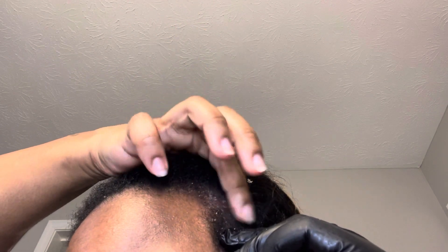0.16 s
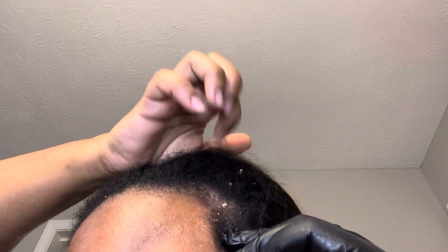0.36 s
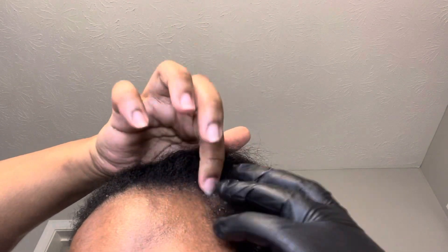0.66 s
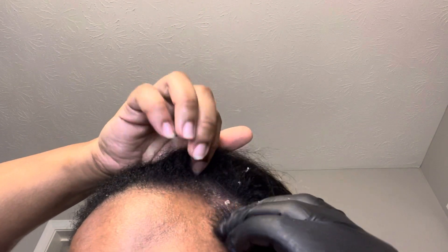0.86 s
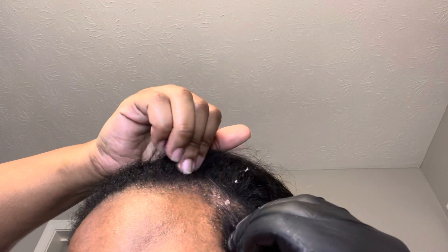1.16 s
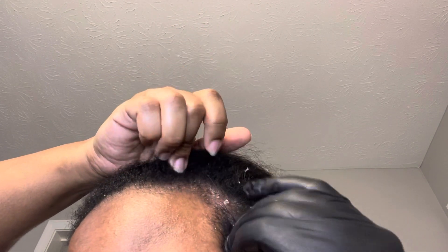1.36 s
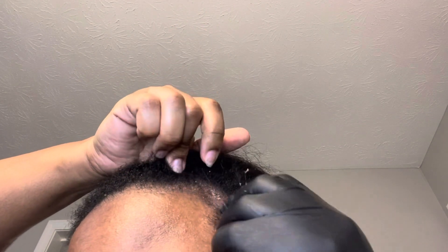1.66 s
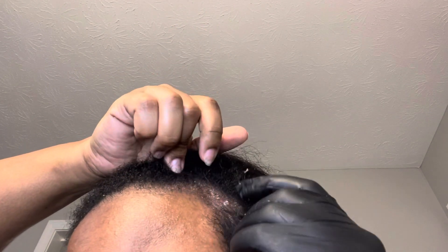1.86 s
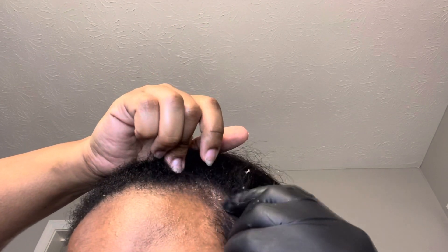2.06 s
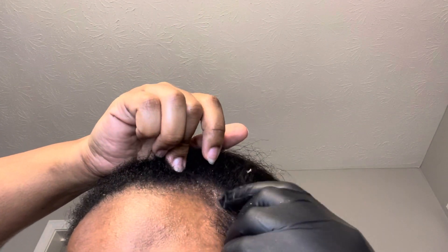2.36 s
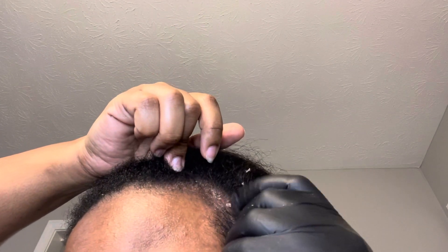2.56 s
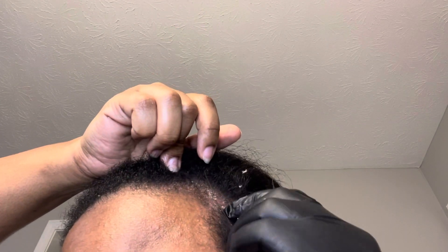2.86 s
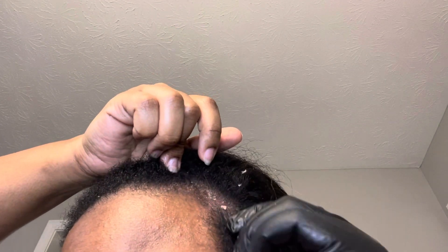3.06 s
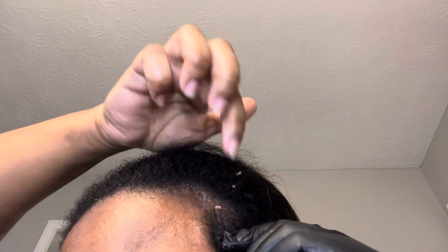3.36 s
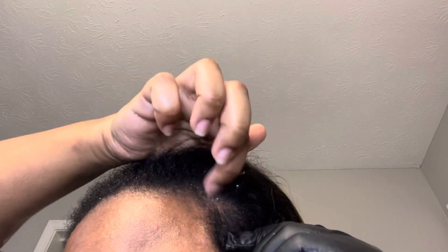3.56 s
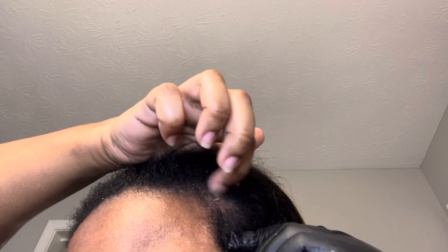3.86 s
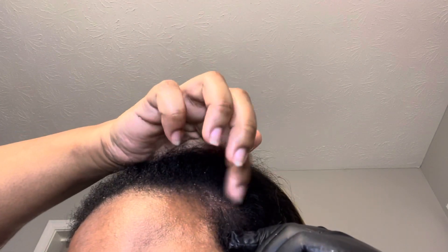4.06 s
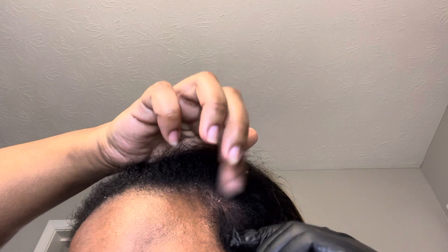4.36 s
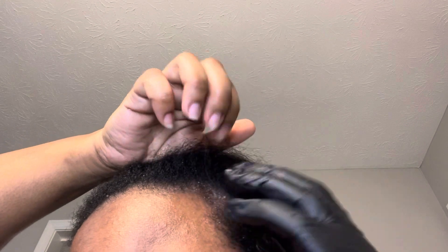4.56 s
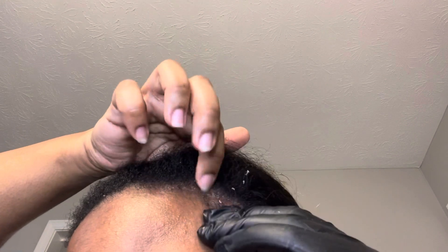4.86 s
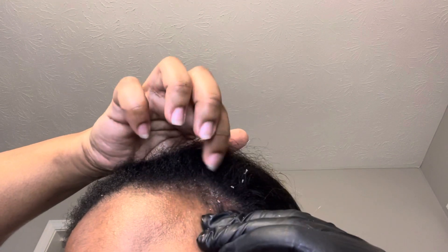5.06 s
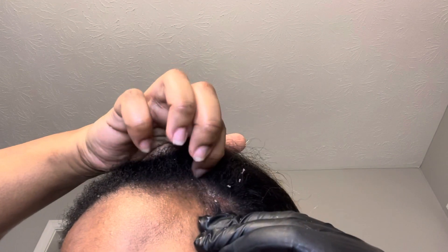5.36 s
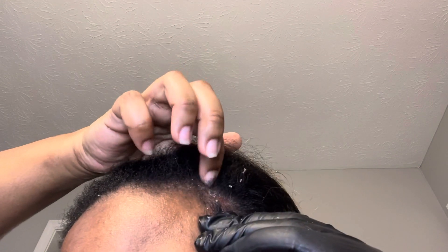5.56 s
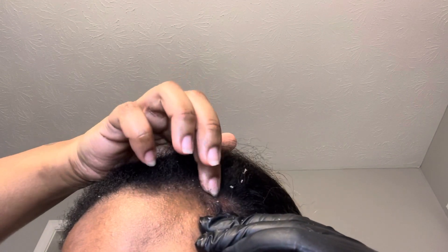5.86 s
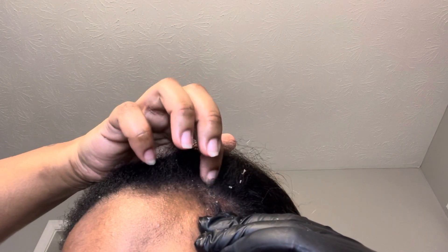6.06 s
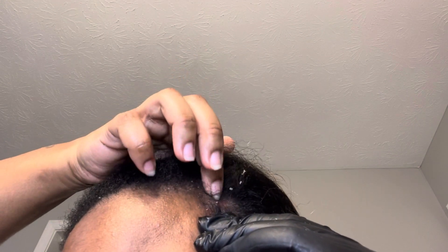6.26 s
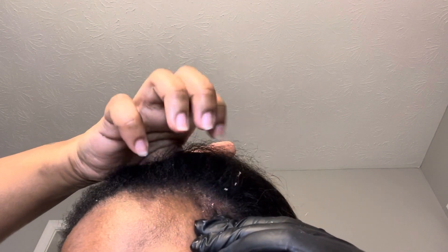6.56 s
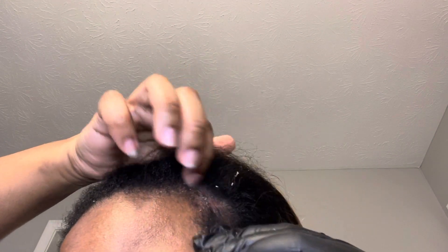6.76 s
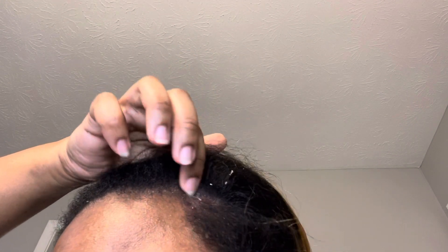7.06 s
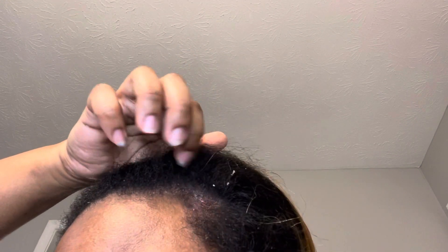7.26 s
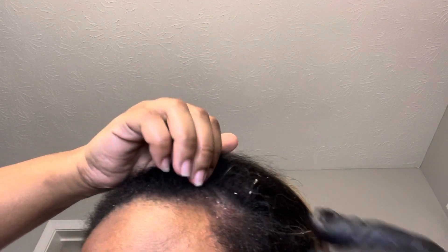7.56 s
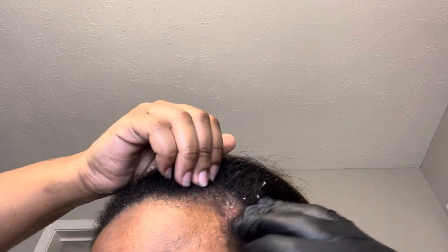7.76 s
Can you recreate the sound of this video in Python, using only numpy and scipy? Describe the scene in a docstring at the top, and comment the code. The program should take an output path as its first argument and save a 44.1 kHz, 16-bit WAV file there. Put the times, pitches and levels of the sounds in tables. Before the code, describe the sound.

Fingernails flick and pick at a dry scalp through thick hair, crisp irregular scratches and tiny snaps over a steady low indoor hum.

```python
"""Dry scalp scratching, close up

In a small room, fingernails scratch and pick at a dry scalp through thick hair while a gloved hand parts it,
close to a pair of spaced microphones, the left one nearer. Strokes are coloured noise made of random hair slips;
picks are clicks with a short crackle. Sparse wall reflections follow. Behind, motors hum as steady harmonics,
and a fan's rush of air, filtered noise, rings in the room's low resonances."""
import sys
import numpy as np
from scipy import signal
from scipy.fft import rfft, irfft, next_fast_len
from scipy.io import wavfile
from scipy.ndimage import uniform_filter1d

SR = 44100
rng = np.random.default_rng(int(sys.argv[2]) if len(sys.argv) > 2 else 0)


def wrap_up_sound(samples):
    """Save the sound to the file named by the first command line argument, as 16-bit audio."""
    columns = np.atleast_2d(samples).T
    # keep every value between -1 and 1, then stretch to whole-number steps
    tamed = np.clip(columns, -1, 1)
    steps = np.round(tamed * 32767).astype(np.int16)
    wavfile.write(sys.argv[1], SR, steps)


N = 348831  # samples

# Noise colours of hair tips, of the hair, of the skin and of the head's low resonance:
# frequency_hz, level_db (relative, per Hz)
WISP_COLOUR = [(5000, -23), (8500, -21.5), (10500, 0), (12500, -2.5), (14500, 3), (16000, -0.5)]
RUSTLE_COLOUR = [(1500, -13), (2800, 0), (4000, -7.5), (5500, -9), (7000, 1.5), (8500, 3), (10500, -1),
                 (12500, 0), (16000, -4.5)]
RUB_COLOUR = [(1500, -21.5), (2600, -5), (3500, -1.5), (4400, 4.5), (5300, 3.5), (6300, -0.5), (8000, -8),
              (10000, -39), (16000, -15)]
KNOCK_COLOUR = [(1100, -40), (1700, -12), (2400, -1), (3200, -1), (4200, -10), (7000, -30)]


def strokes():
    """Wisp of hair tips, rustle of the hair and rub on the skin, each under its own pressure."""
    wisp_gain, rustle_gain, rub_gain, scrape_gain = pressure()
    wisp_slips = slips(per_s=670, spread_db=3.5, t60=0.011, smooth=1.7, same=1.0)
    rustle_slips = slips(per_s=830, spread_db=5.5, t60=0.011, smooth=1.8, same=1.0)
    rub_slips = slips(per_s=920, spread_db=3.0, t60=0.004, smooth=1.0, same=0.43)
    scrape_slips = slips(per_s=400, spread_db=-1.5, t60=0.006, smooth=0.54, same=0.34)
    hair = colour(wisp_slips, WISP_COLOUR) * wisp_gain
    hair += colour(rustle_slips, RUSTLE_COLOUR) * rustle_gain
    skin = colour(rub_slips, RUB_COLOUR) * rub_gain
    skin += colour(scrape_slips, KNOCK_COLOUR) * scrape_gain
    contact = hair * pair(-0.2)[:, None] + skin * pair(-2.0)[:, None]
    return tufts(contact) + catches(rustle_gain + wisp_gain, rub_gain)


# A nail lands in the hair, then flicks across the skin:
# flick_s, wisp_db, rustle_db, rub_db, fade_s, landing_ahead_s, landing_wisp_db
SCRATCHES = [(.285, -60, -63, -69, 0.11, 0.023, -59), (0.708, -54, -51, -59.5, 0.15, 0.028, -58.5),
             (3.531, -72, -59.5, -63, .11, 0.026, -57), (3.837, -64, -57, -60, 0.12, 0.042, -64.5),
             (4.129, -65, -54.5, -60.5, 0.13, 0.041, -78), (4.386, -56, -49.5, -58.5, 0.14, 0.011, -60),
             (4.866, -70, -52, -64.5, 0.22, 0.027, -57.5), (5.265, -59, -57.5, -67.5, 0.15, 0.076, -58),
             (5.495, -62, -57, -64, 0.076, 0.035, -67), (5.93, -68, -65, -76, 0.12, 0.028, -60),
             (6.378, -51, -55.5, -64, 0.08, 0.028, -58), (6.717, -53, -52, -59, 0.16, 0.016, -60.5),
             (7.089, -64, -50, -57, 0.14, 0.014, -54.5)]
# Fingers or glove drag slowly through the hair: peak_s, wisp_db, rustle_db, rub_db, fade_s, rise_s
DRAGS = [(0.061, -62, -65.5, -76, 0.14, 0.076), (.511, -73, -60, -65, 0.2, 0.094),
         (.595, -80, -80, -78, .08, .05), (.811, -72, -58, -63, 0.26, 0.18),
         (.925, -75, -67, -64, 0.27, .2), (1.055, -73, -72, -85, 0.087, 0.08),
         (1.1, -80, -81, -91, 0.1, .1), (1.236, -78, -64, -71.5, 0.17, 0.13),
         (1.48, -71, -68, -70.5, 0.78, 0.092), (1.659, -76, -62, -58.5, 0.43, 0.27),
         (1.78, -103, -72, -70, 0.045, 0.25), (1.955, -72, -69, -74, 0.32, 0.078),
         (2.112, -78, -64.5, -59.5, 0.15, 0.28), (2.313, -82, -75, -69.5, 0.17, 0.09),
         (2.411, -72, -64, -57.5, 0.13, 0.12), (2.5, -81, -74, -70.5, 0.13, .1),
         (2.62, -89, -78, -60, 0.026, 0.023), (2.73, -82, -76, -71, 0.44, 0.16),
         (2.842, -73, -76, -68.5, 0.11, 0.49), (2.96, -70, -69, -61.5, 0.8, 0.08),
         (3.143, -66, -71, -88, 0.31, 0.31), (3.998, -80, -79, -87, 0.064, 0.2),
         (4.61, -79, -66, -71, 0.48, 0.2), (4.761, -93, -73, -76, 0.8, 0.46),
         (5.145, -71, -74, -85, 0.074, 0.07), (5.394, -66, -73, -84, .05, .04),
         (5.616, -75, -81, -87, 0.071, 0.22), (5.734, -65, -70, -80, 0.075, 0.032),
         (5.8, -82, -79, -86, 0.074, .08), (6.03, -78, -83, -90, 0.092, .1),
         (6.105, -70, -77, -89, .08, .06), (6.203, -64.5, -71, -88, 0.069, .11),
         (6.66, -86, -77, -77.5, 0.18, 0.51), (6.88, -76, -74, -71.5, 0.15, 0.29),
         (7.035, -69, -76, -78, .08, .012), (7.062, -60, -63, -70, .06, .012),
         (7.15, -57, -73, -79, 0.075, .08), (7.443, -66, -63.5, -69, 0.28, 0.12),
         (7.783, -79, -62, -64.5, 1, 0.17)]
SPAN_DB = 30  # what a rise climbs over rise_s and a fade loses over fade_s
REST_DB = (-98, -93, -99)  # hands resting in the hair: wisp, rustle, rub
FLICK_RISE_S, LANDING_RISE_S, LANDING_FADE_S = 0.01, 0.046, 0.08
LANDING_RUSTLE_DB, LANDING_RUB_DB = -9.5, -13.5  # under its wisp: a landing touches hair tips first
SCRAPE_DB = -6  # a flick also sounds the head's low resonance, relative to its rub


def pressure():
    """Wisp, rustle, rub and scrape gains: every contact swells to its peak and fades; their powers add."""
    landings = []
    for flick_s, *_, ahead_s, wisp_db in SCRATCHES:
        levels_db = (wisp_db, wisp_db + LANDING_RUSTLE_DB, wisp_db + LANDING_RUB_DB)
        landings.append((flick_s - ahead_s, *levels_db, LANDING_FADE_S, LANDING_RISE_S))
    flicks = [(*row, FLICK_RISE_S) for *row, _, _ in SCRATCHES]
    peak_s, *layers_db, fade_s, rise_s = np.transpose(DRAGS + landings + flicks)[..., None]
    is_flick = np.arange(len(peak_s))[:, None] >= len(peak_s) - len(flicks)
    layers_db.append(np.where(is_flick, layers_db[-1] + SCRAPE_DB, -np.inf))  # only flicks scrape
    t = np.arange(0, N, 32) / SR  # coarse steps, interpolated below
    shape_db = -SPAN_DB * np.maximum((peak_s - t) / rise_s, (t - peak_s) / fade_s)
    gains = []
    for layer_db, rest_db in zip(layers_db, REST_DB + (-np.inf,)):
        power = amp(2 * (layer_db + shape_db)).sum(0) + amp(2 * rest_db)
        gains.append(np.interp(np.arange(N) / SR, t, np.sqrt(power)))
    return gains


def slips(per_s, spread_db, t60, smooth, same):
    """Many hairs slip at random: uneven short puffs over a smooth hiss; a wide contact differs by side."""
    size = amp(spread_db * np.minimum(rng.exponential(1, N), 5)) * (rng.random(N) < per_s / SR)
    envelope = evened(ringing(size, t60)) + smooth
    left, other = rng.standard_normal((2, N))
    right = same * left + np.sqrt(1 - same ** 2) * other
    return evened(envelope * np.array([left, right]))


PATCH_DB, PATCH_S, PATCH_HZ = 2, 0.027, 1200  # unevenness, and the smoothing length in time and pitch


def tufts(x):
    """Random patches of time and pitch stand out as the contact moves from tuft to tuft."""
    hz, t, z = signal.stft(x, SR, nperseg=128, noverlap=96)
    patches = rng.standard_normal((len(t), len(hz)))
    frames, bins = round(PATCH_S / (t[1] - t[0])), round(PATCH_HZ / hz[1])
    for _ in range(2):
        patches = uniform_filter1d(patches, frames, axis=0)
        patches = uniform_filter1d(patches, bins, axis=1)
    gain = evened(amp(PATCH_DB * evened(patches.T)))
    return signal.istft(z * gain, SR, nperseg=128, noverlap=96)[1][:, :N]


# A nail catches and lets go:
# release_s, snap_db, tick_db (over the snap), knock_db (over the snap), balance_db (left minus right)
PICKS = [(0.1127, -66, -4, -16, 0), (0.0685, -58, -8, -18, 0), (0.26, -54, -19, -16, 0),
         (0.2711, -46.5, -21, -32, -1), (0.295, -55, -12, -22, 0), (0.68, -53, -19, -19, 0),
         (0.7019, -47.5, -1, -6, -10), (0.7085, -58.5, -2, 6, 4), (0.7154, -51, -7, -10, 10),
         (0.7249, -55, 0, -16, -2), (0.7448, -56, -16, -18, 0), (0.852, -58, -10, -20, 0),
         (0.92, -58, 1, -13, 0), (0.936, -63, -2, -15, 0), (0.9985, -58, -11, -23, 0),
         (1.051, -62, -2, -21, 0), (1.061, -65, -15, -25, 0), (1.5086, -60, -3, -7, 0),
         (1.6564, -49, -17, -24, 3), (1.732, -66, -8, -16, 2), (1.778, -66, 4, -15, 0),
         (1.984, -58, 2, -13, -1), (2.0427, -52.5, -1.5, -22, -1), (2.113, -57, -6, -11, 0),
         (2.3694, -58.5, -3, -10, 1), (2.418, -56, 4, -6, -3), (2.622, -74, 9, 9, 0),
         (2.712, -66, -6, -15, -3), (3.068, -60, -8, -10, -6), (3.534, -62, -6, 2, 10),
         (3.821, -60, -8, -20, 0), (3.8363, -48, -2, -25, 8), (3.844, -51.5, -11, -6, -9),
         (4.1322, -42, -1.5, -13, 6), (4.3805, -54, -20, -25, 1), (4.395, -60.5, -6, 8, -3),
         (4.405, -47.5, -2, -4, 3), (4.6128, -54.5, 14.5, -23, -1.5), (4.769, -58, -12, -24, 1),
         (4.85, -63, 6, -1, 0), (4.862, -50, 9.5, -16, -4), (4.874, -54, 2, -12, 0),
         (4.88, -47, -15, -9, 6), (4.9118, -51, -15, -18, 0), (5.0675, -61, -8, -23, 5),
         (5.1413, -61, -10, -18, 0), (5.1737, -56, -11, -23, -1), (5.1953, -50, -12, -22, -1),
         (5.199, -51, -10, -22, 0), (5.2428, -47.5, -4.5, -30, 7), (5.262, -44.5, -2.5, -30, -9.5),
         (5.278, -54, -15, -23, 3), (5.287, -54, -12, -23, 0), (5.301, -59, -15, -25, 0),
         (5.315, -59, -15, -25, 0), (5.329, -62, -15, -25, 0), (5.3868, -64, -10, -20, 0),
         (5.497, -42, -7, -8, 0), (5.502, -53, -3, -6, -1), (5.8871, -53, -22, -28, 0),
         (5.9272, -49.5, -15, -24, -2), (5.946, -52, -15, -19, -1), (6.1031, -60, -8, -10, 2),
         (6.3386, -58, -24, -26, 0), (6.377, -46.5, -12, -28, -2), (6.3823, -50.5, -11, -12, -6),
         (6.627, -64, -1, -15, 0), (6.7247, -55, -9, -30, -4), (6.743, -55, 4, -7, -5),
         (6.83, -56, -1.5, -23, 0), (6.925, -66.5, -4, -20, -2), (7.023, -48, -12, -32, 4),
         (7.0666, -54, -7, -21, 0), (7.0851, -35, -5.5, -11, -4), (7.0935, -54, -6, -12, 0),
         (7.108, -56, -6, -6, 0), (7.1003, -55, -3, -3, -6), (7.448, -53.5, -11, -9, 5),
         (7.465, -65, -5, 7, -18), (7.473, -50.5, -10, -22, -5), (7.5103, -54, -9, -8, 2),
         (7.5738, -64, -13, -12, 0), (7.8312, -54.5, 6.5, -15, 1), (7.9025, -54.5, 4, -5, 0)]
# Colours of the bright snap and the nail tick: frequency_hz, level_db (relative, per Hz)
SNAP_COLOUR = [(1500, -37), (3500, -9), (6000, -28), (8000, 20.5), (9500, 10.5), (11000, 16.5),
               (13000, 12.5), (16000, 5.5)]
TICK_COLOUR = [(1200, -37), (2600, -2.5), (3800, -8.5), (4800, -4.5), (6500, -4), (8500, -2),
               (13000, -27.5)]
PICK_RISE_S, PICK_T60_S = 0.0007, 0.0041
TAIL_DB, TAIL_T60_S = (-13.5, -19, -21), 0.047  # freed hairs go on crackling after snap, tick and knock
PICK_CLICK = 2.66  # height of the release itself, over the crackle's noise


def picks():
    """Each catch is a click and a short crackle of freed hairs: bright snap, nail tick and low knock together.
    The knock spreads through the head, so each side gets its own crackle."""
    t = np.arange(1300) / SR
    parts = np.zeros((3, 2, N + len(t)))
    crackles = rng.standard_normal((len(PICKS), 2, len(t)))
    after = np.maximum(t - PICK_RISE_S, 0)
    tails = amp(np.array(TAIL_DB)[:, None, None] - 60 * after / TAIL_T60_S)
    rise = np.minimum(t / PICK_RISE_S, 1) ** 2
    envelope = (amp(-60 * after / PICK_T60_S) + tails) * rise
    click = PICK_CLICK * (np.arange(len(t)) == round(PICK_RISE_S * SR))
    for (release_s, snap_db, tick_db, knock_db, balance_db), noise in zip(PICKS, crackles):
        one_side = noise[[0, 0]]
        sides = np.array([one_side, one_side, noise]) * envelope + click
        # the level counts over the first 1.5 ms, before colouring
        sides *= amp(snap_db) / np.sqrt(np.mean(sides[..., :66] ** 2, axis=2, keepdims=True))
        sides *= amp([0, tick_db, knock_db])[:, None, None] * pair(balance_db)[:, None]
        start = round((release_s - PICK_RISE_S) * SR)
        parts[:, :, start:start + len(t)] += sides
    return sum(colour(part, shape) for part, shape in zip(parts, (SNAP_COLOUR, TICK_COLOUR, KNOCK_COLOUR)))


CATCHES_PER_S, CATCH_DB, CATCH_SPREAD_DB, CATCH_TICK_DB = 140, -7, 2, -7


def catches(rustle_gain, rub_gain):
    """Small catches at random, snap and tick, scaled by the stroke they ride on."""
    size = amp(CATCH_DB + CATCH_SPREAD_DB * np.minimum(rng.exponential(1, N), 3))
    size *= rng.random(N) < CATCHES_PER_S / SR
    bursts = ringing(size, PICK_T60_S) * rng.standard_normal(N)
    snaps = colour(bursts * rustle_gain, SNAP_COLOUR)
    return snaps + amp(CATCH_TICK_DB) * colour(bursts * rub_gain, TICK_COLOUR)


LEFT_LEADS_S = 7.67 / 44100


def spaced(x):
    """The head is nearer the left microphone: the right one hears it a moment later."""
    size = next_fast_len(N + 64)
    delay = np.exp(-2j * np.pi * np.fft.rfftfreq(size, 1 / SR) * LEFT_LEADS_S)
    late = irfft(rfft(x[1], size) * delay, size)
    return np.array([x[0], late[:N]])


WALL_HZ = 3870  # reflections dull above this
WALLS_DB = -17  # gain on the reflections, applied in scene()


def walls(x):
    """Sparse reflections of random sign, different at each microphone; hair and cloth soak up the treble."""
    taps = np.zeros((2, 12000))
    at = np.arange(60, 11980, 20) + rng.integers(0, 20, (2, 596))  # one in every 20 samples
    echoes = rng.choice([-1., 1.], at.shape) * amp(-60 * at / SR / 0.19)  # 60 dB down in 0.19 s
    np.put_along_axis(taps, at, echoes, 1)
    taps /= np.linalg.norm(taps[0])
    taps = signal.lfilter([1], [1, -np.exp(-2 * np.pi * WALL_HZ / SR)], taps)
    return signal.oaconvolve(x, taps, axes=1)[:, :N]


# Motors, each a steady tone series that the room deals unevenly to the microphones:
# fundamental_hz, then a list of (multiple, left_db rms, right_db rms, left_leads_rad)
MOTORS = [(59.36, [(1, -62, -59, .2), (3, -64, -68, 3.0), (5, -65, -82, -2.0), (7, -80, -67, -.9),
          (9, -86, -73, -.9), (10, -81, -75, -1.6), (11, -72.5, -66.5, .8), (12, -80, -80, 1.0),
          (13, -82, -73, 1.7), (14, -77, -94, -2.7), (15, -76, -80, -2.3), (17, -87, -89, -1.8),
          (19, -92, -82, -2.4), (20, -90, -96, 1.9)]), (124.63, [(1, -56.5, -61.5, .6),
          (2, -52, -47.5, -.3), (3, -77, -74, .8)]), (31.97, [(1, -86, -82, .1), (3, -79, -78, .6),
          (5, -62, -64, 0), (8, -70, -67, .5), (10, -66, -64, .6), (11, -70, -67, -2.6),
          (12, -76, -72, -3.0)]), (37.1, [(1, -78, -76, .1)]), (64.66, [(1, -81, -70, 0)])]


def motors():
    """Each motor hums as clean steady sines at multiples of its fundamental."""
    out, t = np.zeros((2, N)), np.arange(N) / SR
    for fundamental_hz, series in MOTORS:
        for multiple, left_db, right_db, lead in series:
            phase = 2 * np.pi * (multiple * fundamental_hz * t + rng.random())
            out += np.sqrt(2) * amp([[left_db], [right_db]]) * np.sin([phase + lead, phase])
    return out


# Spectrum of the broad rush of air: frequency_hz, level_db (relative, per Hz)
AIR_COLOUR = [(14, -62), (24, -53), (36, -17.5), (84, -15), (105, -12), (148, -14), (175, -9), (250, -5),
              (490, -20), (740, -18.5), (1150, -27.5), (1700, -32), (2750, -39), (4800, -48), (8000, -57),
              (12000, -98), (16000, -86)]
# Rush at the two microphones: frequency_hz, balance_db (left minus right)
AIR_BALANCE = [(40, -7), (150, 7.5), (270, 3.5), (500, 0), (1000, 1), (2200, -2.5), (5000, 0), (12000, 7)]
# Left-right likeness of the rush: frequency_hz, likeness (-1 to 1)
AIR_LIKENESS = [(30, 1), (80, 0.45), (150, 0.91), (270, 0.11), (490, -0.75), (800, 0.98), (2000, -0.18),
                (6000, 0.5)]
# Room resonances in the fan noise:
# centre_hz, width_hz, level_db (rms), balance_db (left minus right), likeness (left-right, held to -1 to 1)
ROOM_RESONANCES = [(53, 16, -69, -5.5, 1), (109.6, 12, -69, 0, 0.79), (128.4, 8.3, -63.5, -6, 0.97),
                   (162.2, 13, -61, -4, 1), (204, 24, -59, -4.5, 0.88), (224, 17.5, -57.5, -8, 0.96),
                   (243, 12, -56, -5, .93), (272, 80, -69.5, 12, 0.11), (298, 9.6, -69, 2, 0.95),
                   (314.6, 13, -60.5, -8, 0.88), (334.2, 16.5, -61, -9.5, 0.91),
                   (370.6, 8.1, -65.5, 2, 0.032), (386.5, 12, -68.5, -6, 0.048), (440, 17, -63, -4, 0.27),
                   (464, 50, -77, -2, -0.45), (516, 13, -72.5, 1, 0.54), (584, 33, -72, 5, 0.5),
                   (617.6, 31, -67.5, -8.5, 0.92), (636.3, 13, -65, 6, 0.62),
                   (654.6, 13.7, -65.5, -6, 0.79), (685, 40, -66, -2, -1.2), (689, 40, -70.5, -9.5, -0.46),
                   (887.5, 31, -74, -6.5, 0.69), (928, 12, -80.5, 9.5, 0.37), (986, 23, -84, 3, 0.087),
                   (1056, 39, -80, -9.5, 0), (1246, 30, -76.5, -7, 0.7), (1312, 22, -82.5, 0, -0.19),
                   (1310, 24, -94, 9, 0.28), (1580, 7.2, -89, 5, 0.15)]
AIR_DB = -52  # rms of the rush before its left-right balance
FAN_LEADS_S = 0.00029  # the fan too is nearer the left microphone


def fan():
    """Broad rush of air and the room resonances it excites: noise shaped bin by bin for each microphone."""
    size = next_fast_len(N)
    hz = np.fft.rfftfreq(size, 1 / SR)
    a, b, c, d = rng.standard_normal((len(hz), 4)).T
    first, second = a + 1j * b, c + 1j * d
    air_power = amp(2 * read(AIR_COLOUR, hz))
    air_power *= amp(2 * AIR_DB) / air_power.sum()
    power = air_power * pair(2 * read(AIR_BALANCE, hz))
    shared = np.sqrt(power[0] * power[1]) * read(AIR_LIKENESS, hz)
    for centre_hz, width_hz, level_db, balance_db, likeness in ROOM_RESONANCES:
        peak = 1 / (1 + (2 * (hz - centre_hz) / width_hz) ** 2) ** 2
        peak *= amp(2 * level_db) / peak.sum()
        power = power + peak * pair(2 * balance_db)[:, None]
        shared = shared + peak * np.clip(likeness, -1, 1)
    same = shared / np.sqrt(power[0] * power[1])
    right = same * first + np.sqrt(abs(1 - same ** 2)) * second
    z = np.array([first, right]) * np.sqrt(power)
    z[1] *= np.exp(-2j * np.pi * hz * FAN_LEADS_S)
    return irfft(z, size)[:, :N] * size / 2


def amp(db):
    """Amplitude factor for a level in dB."""
    return 10 ** (np.asarray(db) / 20)


def evened(x):
    """Scale to an rms of 1."""
    return x / np.sqrt(np.mean(x ** 2) + 1e-20)


def ringing(hits, t60):
    """Let each hit decay by 60 dB in t60 seconds."""
    return signal.lfilter([1], [1, -amp(-60 / (t60 * SR))], hits)


def read(points, hz):
    """Read a table between its points, along log frequency."""
    f, value = np.transpose(points)
    return np.interp(np.log(hz + 1), np.log(f + 1), value)


def pair(balance_db):
    """Left and right gains for a level difference."""
    return amp(np.array([balance_db / 2, -balance_db / 2]))


def colour(x, points):
    """Causal minimum-phase filter of energy 1 with the given spectrum."""
    log_gain = read(points, abs(np.fft.fftfreq(1024, 1 / SR))) * np.log(10) / 20
    taps = np.fft.ifft(np.exp(np.conj(signal.hilbert(log_gain)))).real[:512]
    taps /= np.linalg.norm(taps)
    return signal.oaconvolve(np.atleast_2d(x), taps[None], axes=1)[:, :N]


def scene():
    """Hands on the head, heard directly and off the walls, over the fan and motors."""
    head = strokes() + picks()
    return spaced(head) + amp(WALLS_DB) * walls(head) + fan() + motors()


EDGE_HZ = 16400


def record(dry):
    """The band limit: a steep low-pass at EDGE_HZ."""
    low_pass = signal.firwin(511, EDGE_HZ, window=("kaiser", 9), fs=SR)
    return signal.oaconvolve(dry, low_pass[None], "same", axes=1)


dry = scene()
out = record(dry)
wrap_up_sound(out)
```